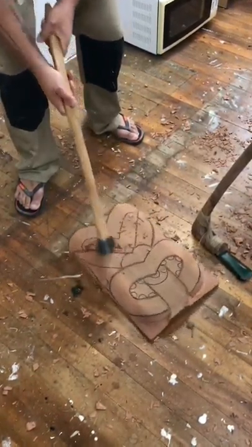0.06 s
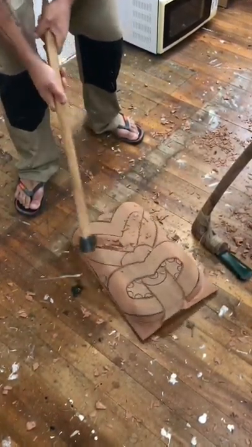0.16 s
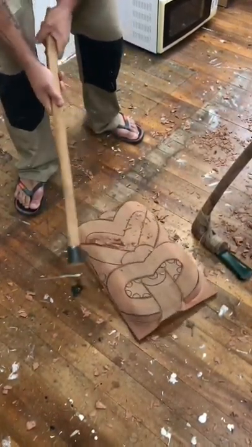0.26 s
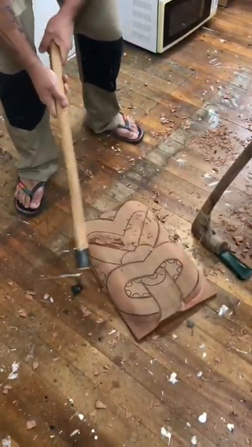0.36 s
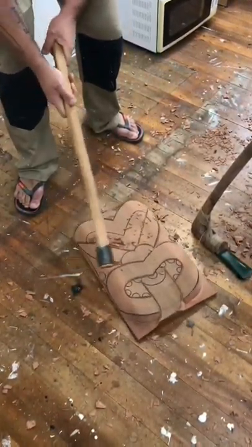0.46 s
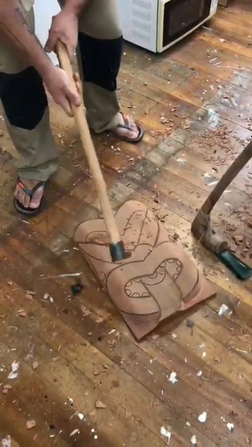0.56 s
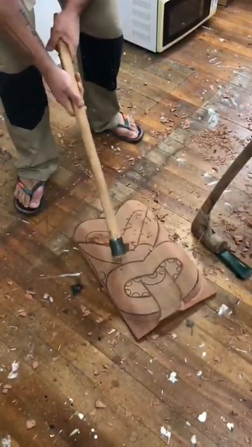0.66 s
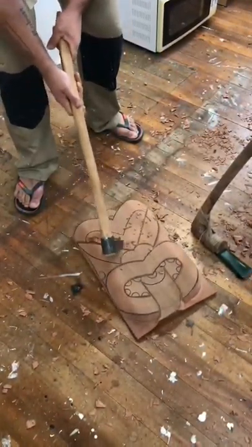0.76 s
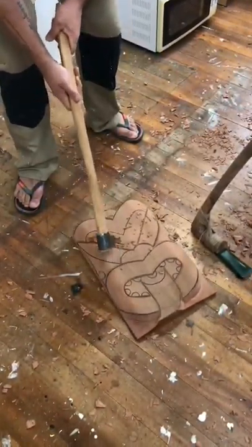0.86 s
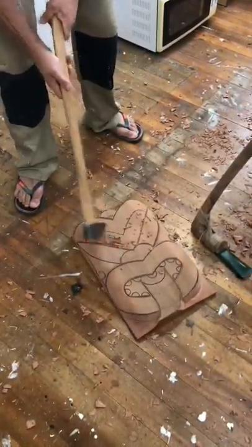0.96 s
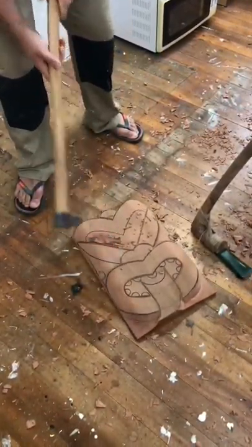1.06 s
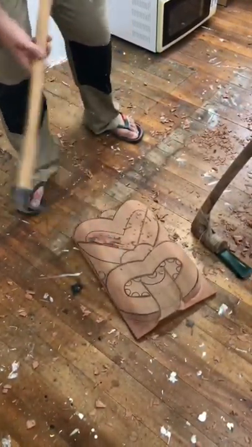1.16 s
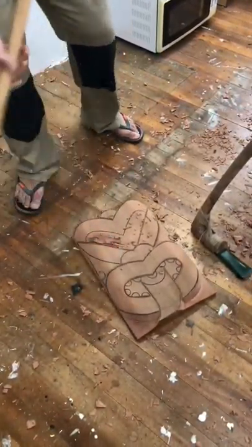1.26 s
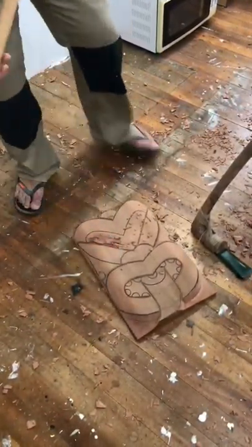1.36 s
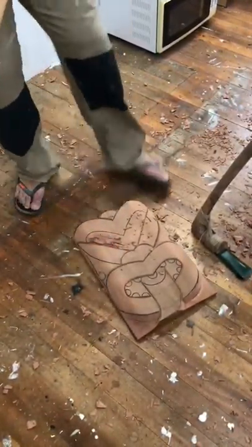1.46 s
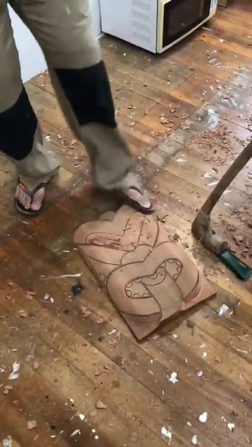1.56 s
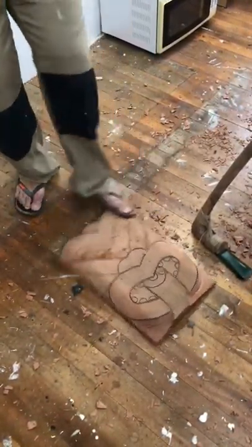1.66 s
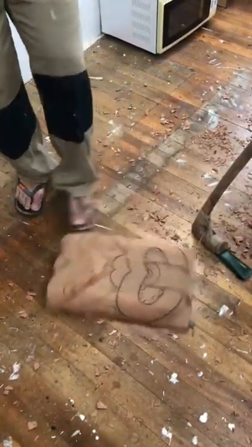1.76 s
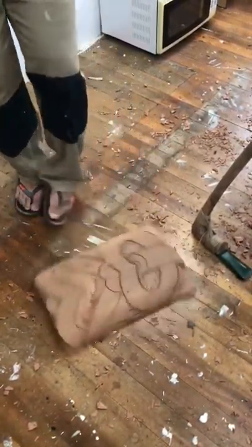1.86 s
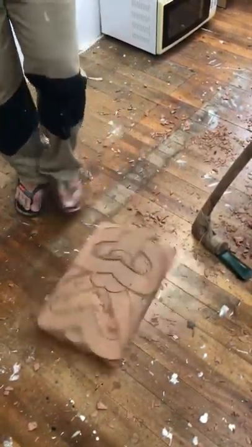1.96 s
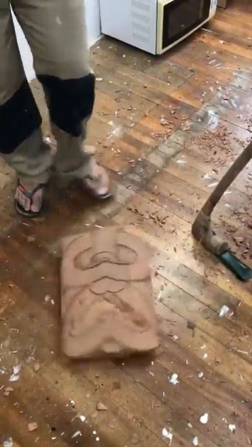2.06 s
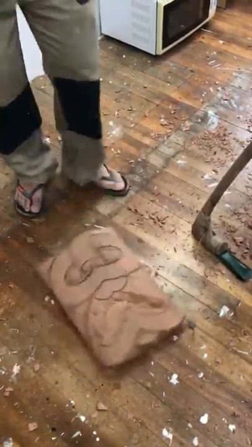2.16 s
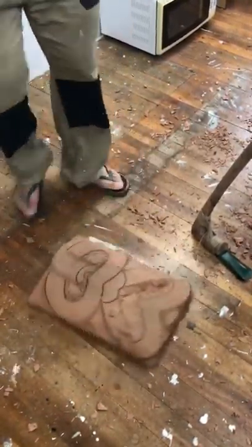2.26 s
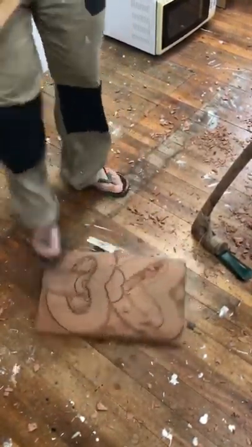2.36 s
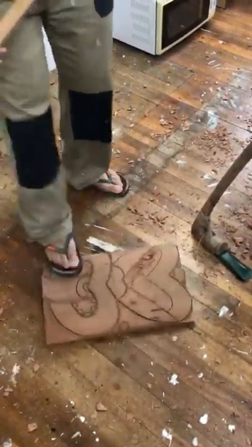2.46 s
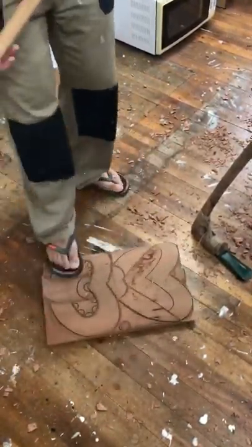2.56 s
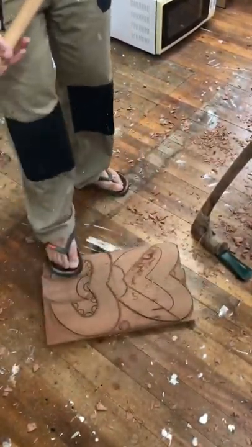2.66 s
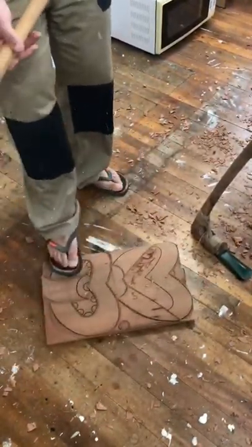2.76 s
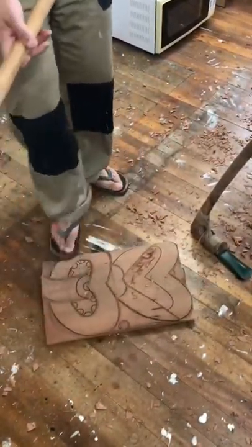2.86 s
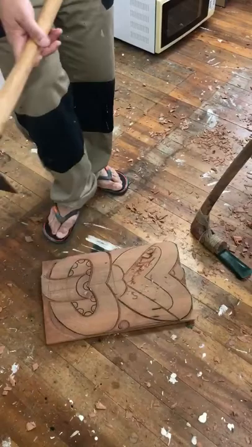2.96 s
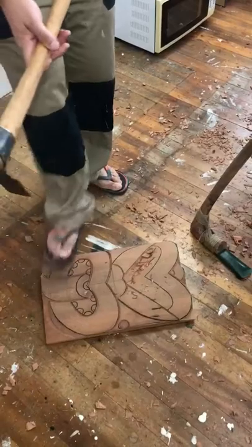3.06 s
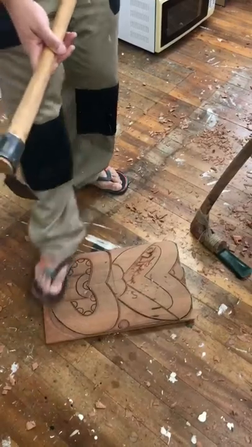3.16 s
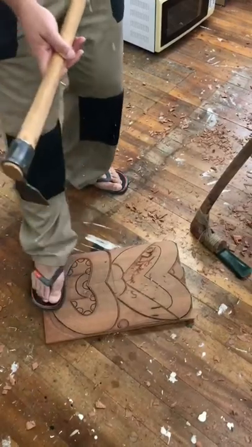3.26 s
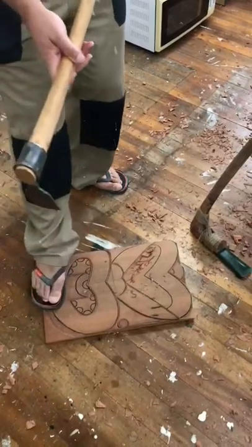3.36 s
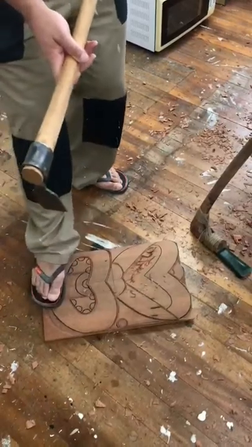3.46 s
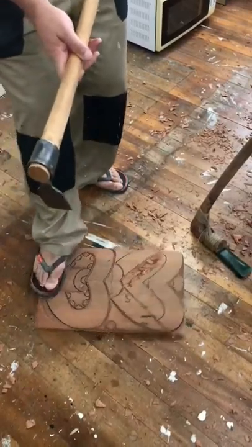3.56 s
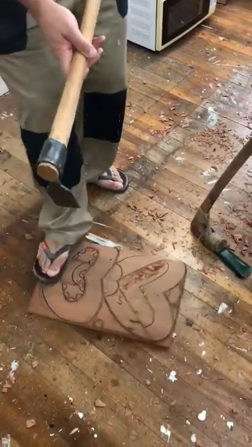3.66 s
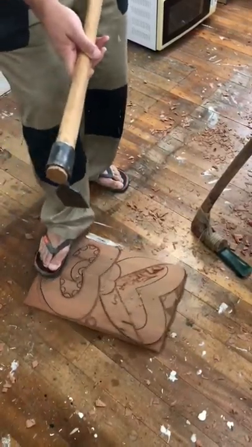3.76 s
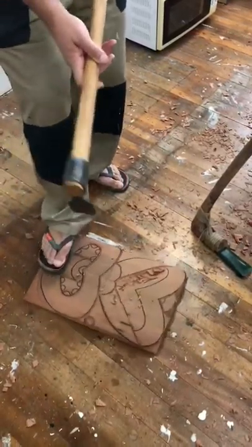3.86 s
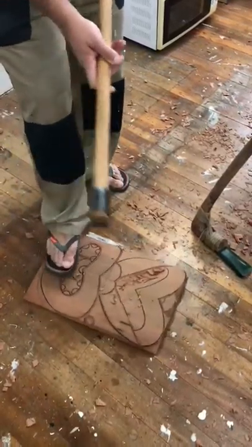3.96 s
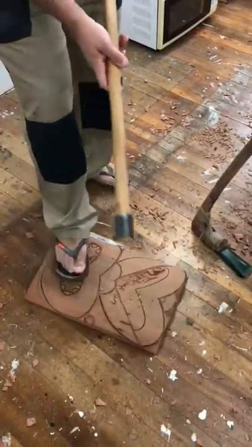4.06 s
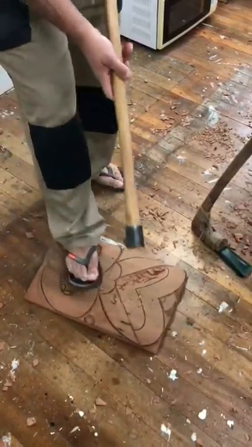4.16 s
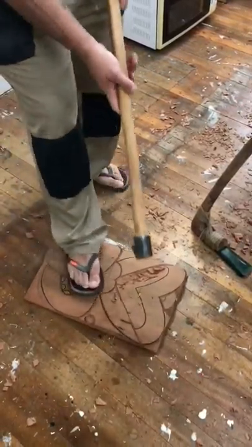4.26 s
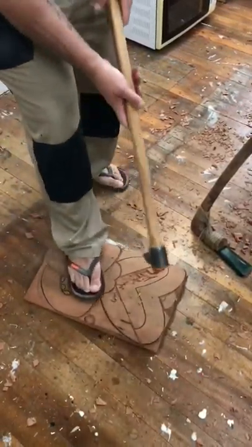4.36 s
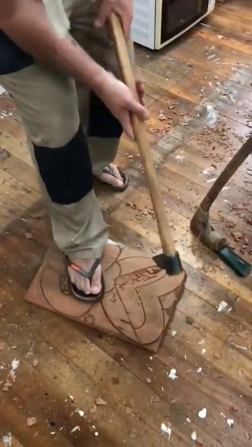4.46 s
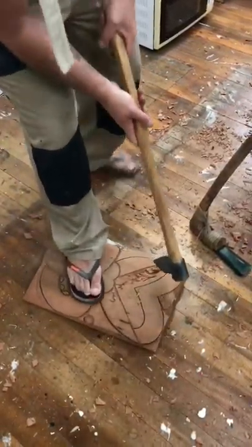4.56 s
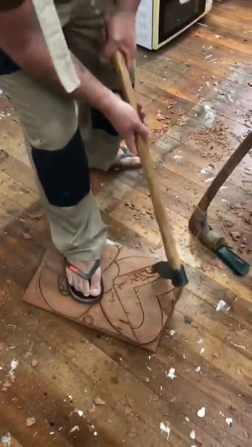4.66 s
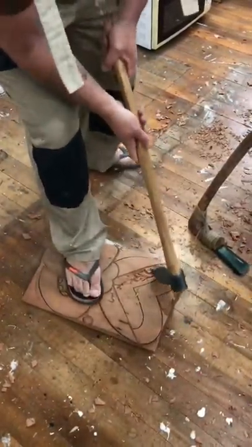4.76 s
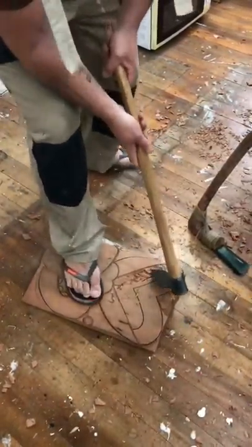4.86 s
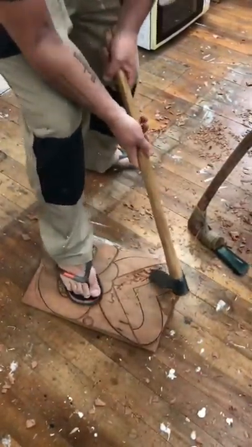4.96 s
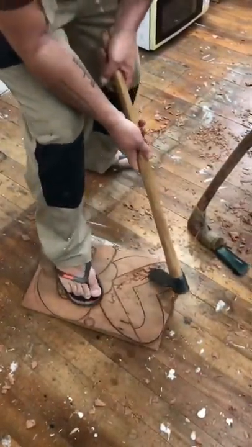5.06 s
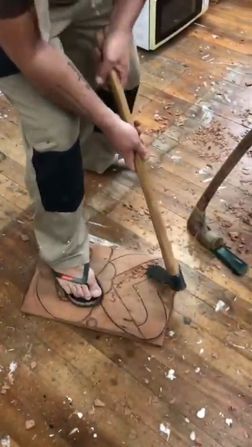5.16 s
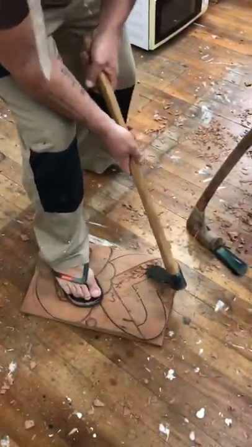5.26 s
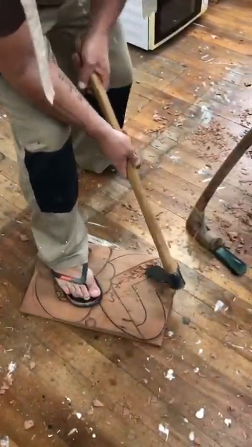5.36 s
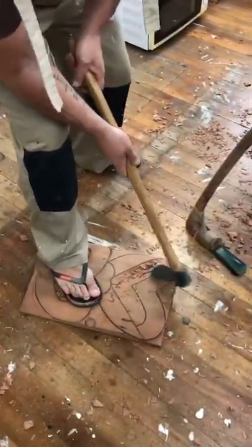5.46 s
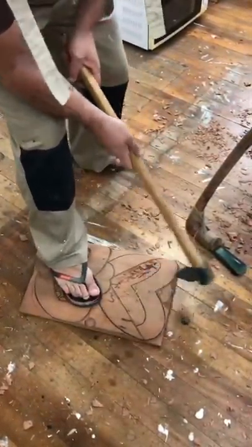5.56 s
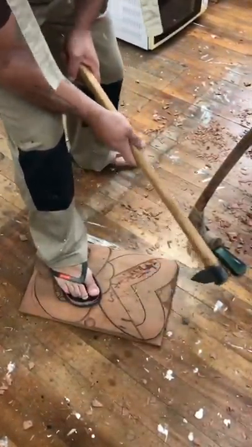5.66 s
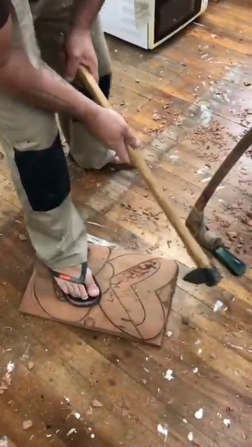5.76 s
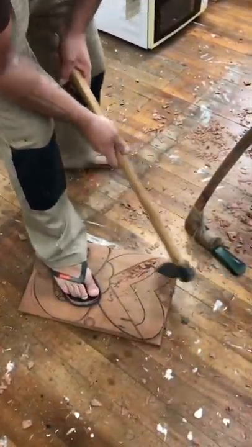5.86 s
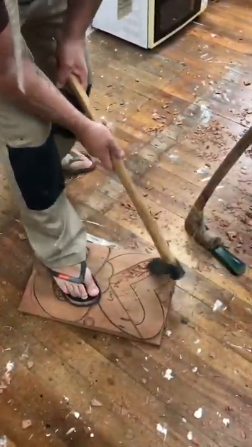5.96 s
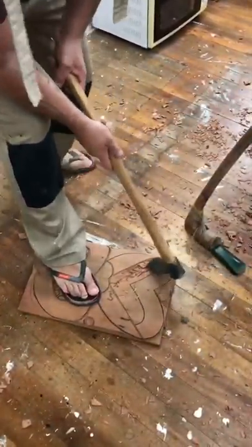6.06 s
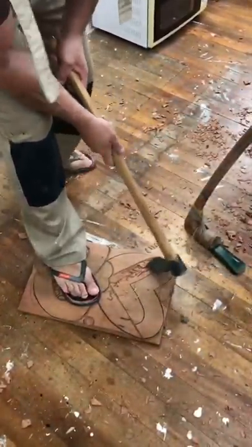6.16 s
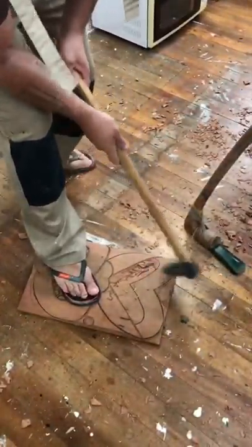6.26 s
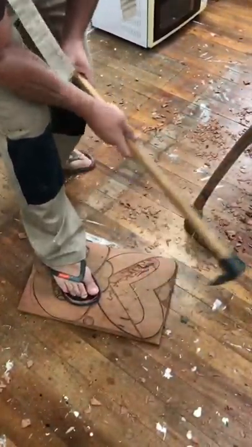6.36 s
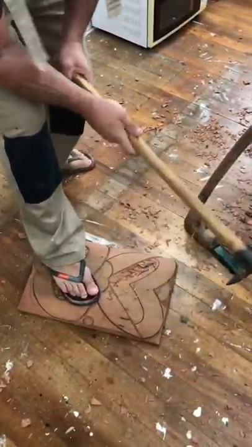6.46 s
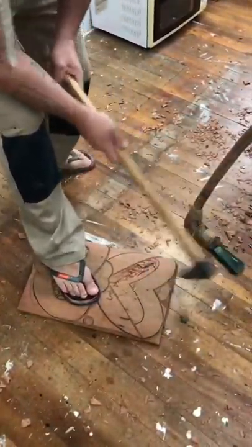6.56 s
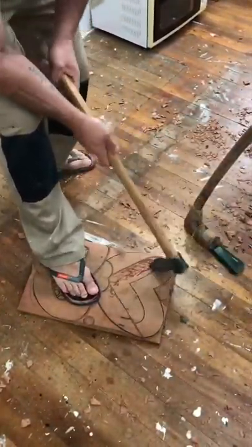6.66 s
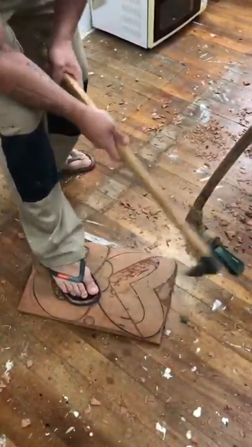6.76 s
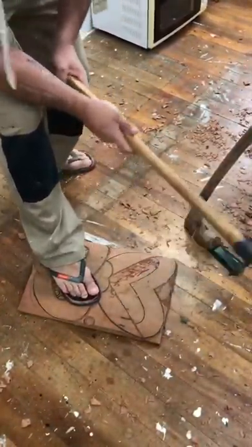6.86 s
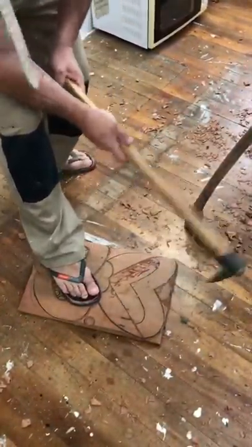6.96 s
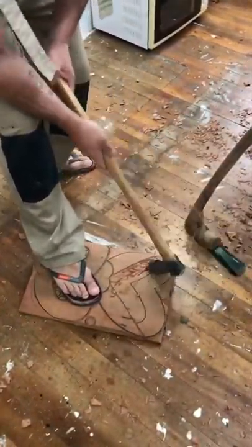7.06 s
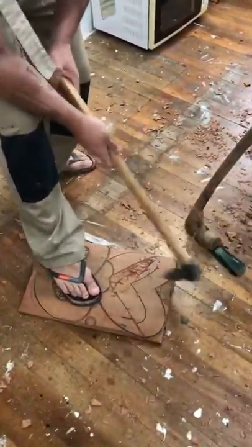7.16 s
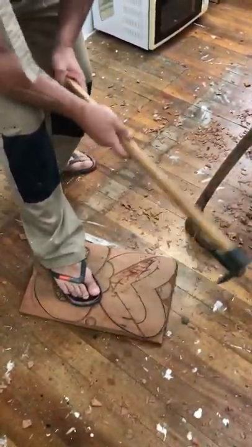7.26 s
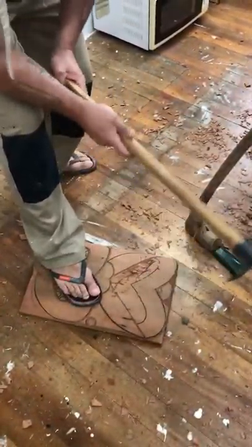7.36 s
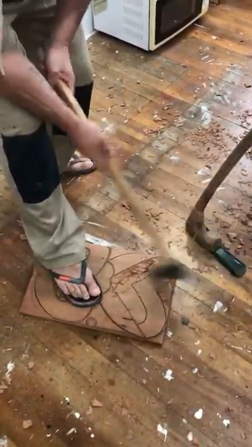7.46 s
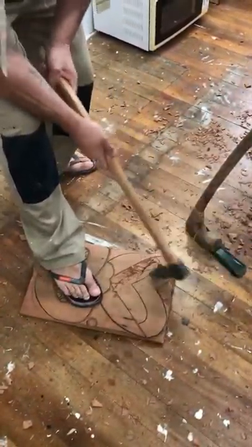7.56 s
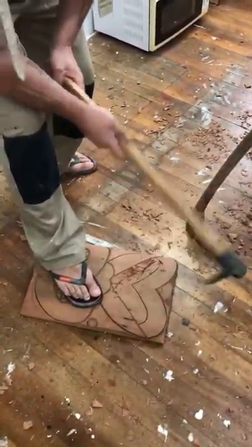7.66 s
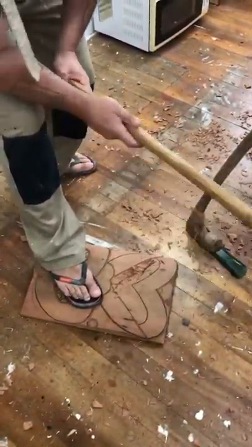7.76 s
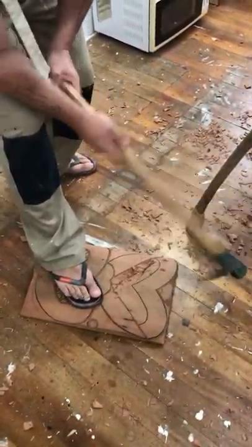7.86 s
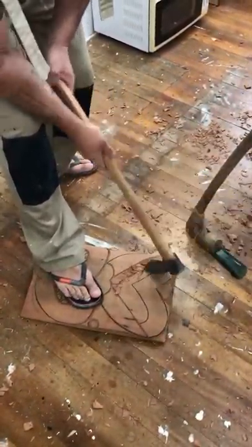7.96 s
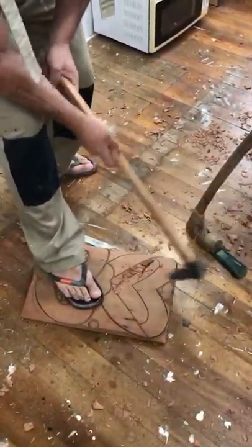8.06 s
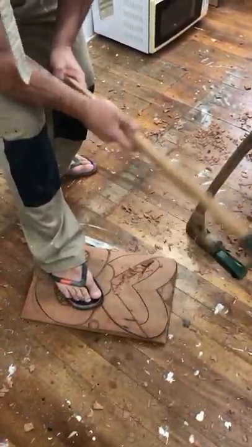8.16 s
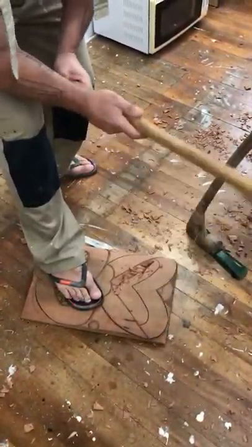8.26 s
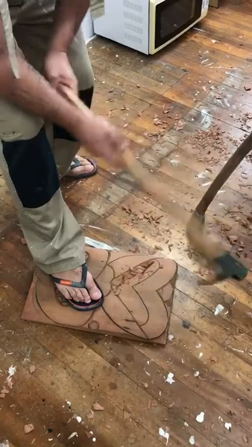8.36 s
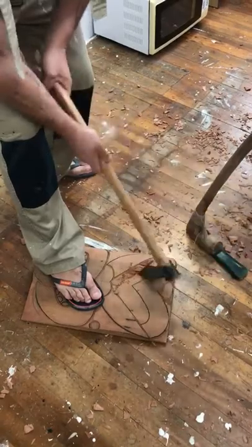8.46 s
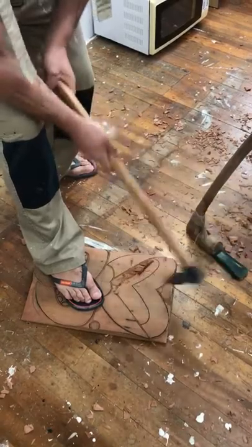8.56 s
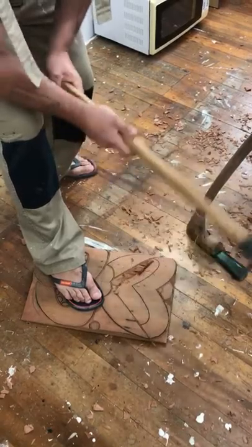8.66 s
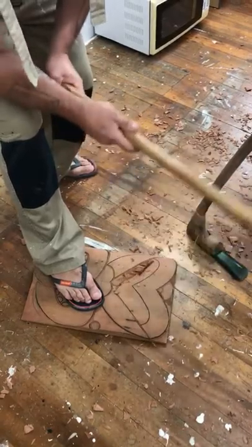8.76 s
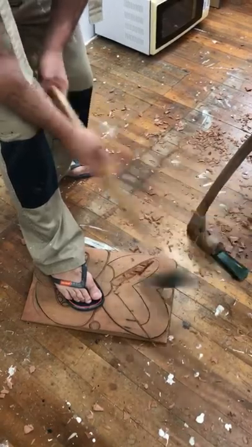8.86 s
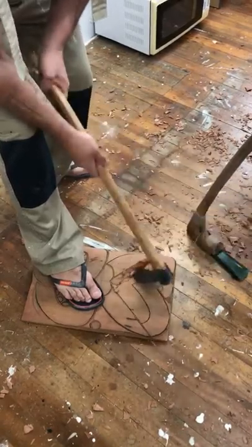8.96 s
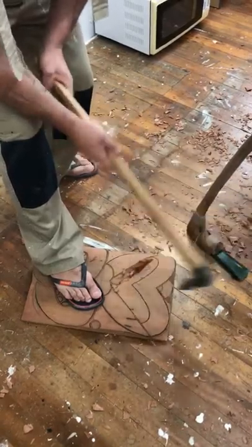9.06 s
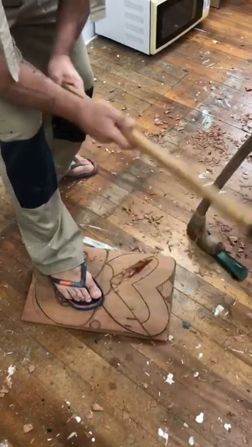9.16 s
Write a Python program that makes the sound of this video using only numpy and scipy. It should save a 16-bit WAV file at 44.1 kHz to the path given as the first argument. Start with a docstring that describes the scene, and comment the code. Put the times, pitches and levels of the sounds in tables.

```python
"""A faint noise dies away into quiet room tone as two light adze cuts bite a carved panel on workshop floorboards.
A foot shoves the panel round with grinding and swish; it rocks and knocks; a trial stroke, then six hard chops.
Each chop is a crunch of noise grains for parting fibres, then a thump of decaying panel and floor modes.
Chatter, dry chip ticks and light taps add detail; decaying noise makes the room's echoes."""
import sys
import numpy as np
from scipy import signal
from scipy.fft import rfft, irfft
from scipy.io import wavfile
from scipy.ndimage import uniform_filter1d, minimum_filter1d

SR = 44100
rng = np.random.default_rng(int(sys.argv[2]) if len(sys.argv) > 2 else 0)


def wav_out(sig):
    """Save sig, one row per channel (or a flat mono array), as 16-bit PCM at SR to the path in sys.argv[1]."""
    wavfile.write(sys.argv[1], SR, np.round(np.clip(np.atleast_2d(sig).T, -1, 1) * 32767).astype(np.int16))


N = 406585
CUTOFF_HZ = 16000
TIME = np.arange(N) / SR
RING = TIME[:SR * 5 // 4]  # time axis of every ring and echo, 1.25 s


def from_db(db):
    """Decibels to gain."""
    return 10 ** (np.asarray(db) / 20)


def rms_one(x):
    """Scale to unit rms."""
    return x / np.sqrt(np.mean(x ** 2) + 1e-20)


def at_hz(points, hz):
    """Read a table on a log-frequency axis."""
    f, value = np.transpose(points)
    return np.interp(np.log(np.maximum(hz, 1)), np.log(f), value)


def add(out, s, sound):
    """Mix a sound in at a time in seconds."""
    start = max(int(s * SR), 0)
    out[start:start + len(sound)] += sound[:max(N - start, 0)]


def lowpass(x, hz, order=2):
    """Butterworth low-pass."""
    return signal.sosfilt(signal.butter(order, min(hz, CUTOFF_HZ), fs=SR, output="sos"), x)


def colour(x, spectrum, size=8192):
    """Causal (minimum-phase) filter of unit power with the given spectrum."""
    gain = rms_one(from_db(at_hz(spectrum, np.fft.rfftfreq(size, 1 / SR))))
    cepstrum = irfft(np.log(gain))[:size // 2]
    cepstrum[0] /= 2
    response = irfft(np.exp(rfft(2 * cepstrum, size)))
    return signal.oaconvolve(x, response)[:len(x)]


def resonate(x, hz, width_hz):
    """Two-pole resonance with gain 1 on top."""
    r = np.exp(-np.pi * width_hz / SR)
    numerator = (1 - r * r) / 2 * np.array([1, 0, -1])
    return signal.lfilter(numerator, [1, -2 * r * np.cos(2 * np.pi * hz / SR), r * r], x)


def grains(count, per_s, spread_db):
    """Random tiny fractures of uneven size; rms 1."""
    sizes = from_db(spread_db * np.minimum(rng.exponential(1, count), 4))
    signs = rng.choice([-1, 1], count)
    happens = rng.random(count) < per_s / SR
    return rms_one(sizes * signs * happens)


def ringing(modes):
    """One decaying sine for each mode."""
    hz, db, t60 = np.transpose(modes)[:, :, None]
    return from_db(db - 60 * RING / t60) * np.sin(2 * np.pi * hz * RING)


# modes of the floorboards and of the air above them: f/Hz, relative level/dB, t60/s
FLOOR_MODES = [(48, -21, 0.6), (71, -7, 0.23), (79, -19, 0.28), (91, -18, 0.29), (115, -13, 0.31),
               (136, -10, 0.26), (154, -13, 0.46), (213, -15, 0.47), (237, -18, 0.59), (260, -14, 0.39),
               (278, -12, 0.37), (313, -20, 0.36)]
# modes of the panel before foot and blade damp it: f/Hz, relative level/dB, t60/s
PANEL_MODES = [(178, -11, 0.47), (351, -8, 0.26), (373, -16, 0.28), (405, -19, 0.3), (433, -15, 0.28),
               (531, -19, 0.27), (604, -16, 0.21), (644, -16, 0.27), (709, -16, 0.26), (752, -21, 0.28),
               (914, -19, 0.24), (1126, -16, 0.19), (1285, -18, 0.2), (1700, -23, 0.07), (2190, -24, 0.08)]
# colour of the chatter on the boards: f/Hz, relative level/dB per Hz
CHATTER_COLOUR = [(100, 3), (250, 3), (450, 0), (700, -0.5), (1300, -4.5), (2000, -9), (3500, -16.5),
                  (6000, -21), (16000, -28)]


def blows(clack_t60=0.11, slap_db=7.0, slap_t60=0.013, vary_db=1.0, detune=0.013, foot_per_s=6.9,
          low_db=3.0, low_hz=90):
    """Each blow rings the panel and the floor beneath; a soft contact reaches only the low modes."""
    # the foot and the resting blade damp the panel
    panel = ringing(PANEL_MODES) * np.exp(-foot_per_s * RING)
    out = np.zeros(N)
    # neighbouring floor modes move in opposite senses, so the boom swells after the knock
    boom = (-1) ** np.arange(len(FLOOR_MODES)) @ ringing(FLOOR_MODES)
    # the joists add weight at the bottom
    boom = boom + (from_db(low_db) - 1) * lowpass(boom, low_hz, order=1)
    # the panel slaps down, then chatters briefly against the boards
    slap = from_db(slap_db) * np.exp(-np.log(1000) * RING / slap_t60)
    settling = slap + np.exp(-np.log(1000) * RING / clack_t60)
    settling /= settling[0]
    for s, floor_db, panel_db, chatter_db, hard_hz in impacts():
        knock = from_db(panel_db + rng.normal(0, vary_db, len(PANEL_MODES))) @ panel
        # its pitch shifts a little as it seats differently on the boards
        knock = np.interp(RING * (1 + detune * rng.standard_normal()), RING, knock)
        chatter = colour(rng.standard_normal(len(RING)) * settling, CHATTER_COLOUR)
        hit = from_db(floor_db) * boom + knock + from_db(chatter_db) * chatter
        add(out, s, lowpass(hit, hard_hz))
    return out


# adze strokes; the blow lands as the cut ends: cut start t/s, cut level/dB before scaling by its swell,
# cut length/s, chip ring f/Hz, ring level against the crunch/dB, blow level/dB, hardness (low-pass) f/Hz
STROKES = [(0.173, -42.5, 0.0049, 12600, 14, -38, 70), (0.936, -27.5, 0.00806, 3830, -9, -4.5, 58),
           (6.134, -25.5, 0.014, 2590, -21, -3, 80), (6.832, -14.5, 0.0075, 1400, -2.5, -2.5, 1500),
           (7.2669, -20.5, 0.0094, 3300, 0.5, -1.5, 1390), (7.6944, -11.5, 0.006, 2860, -15, 1, 1400),
           (8.1365, -15, 0.0056, 1460, -5, 1.5, 1650), (8.636, -11.5, 0.006, 4800, -23, 0.5, 1600),
           (9.1008, -13.5, 0.0051, 2500, -1, 0.5, 1400)]
# the panel rocks and knocks on the boards: t/s, level/dB, hardness (low-pass) f/Hz
KNOCKS = [(2.663, 0.5, 1140), (3.445, -1, 1060), (4.435, -0.9, 1620), (5.355, -12, 616)]
# the feet come down or shift their weight: t/s, level/dB, hardness (low-pass) f/Hz
STEPS = [(1.773, 2, 150), (3.138, 0, 80), (4.088, -1, 62), (4.89, -10.5, 90), (4.945, -13, 80),
         (5.15, 0, 101)]
# mix of each kind of impact, added to its level: floor/dB, panel/dB, chatter/dB
STROKE_SHARE, KNOCK_SHARE, STEP_SHARE = (-2, -1.2, 3.2), (-10, -4.5, -0.3), (-16.5, -24.5, -28)


def impacts():
    """Strokes, knocks and steps share one contact model: t/s, floor/dB, panel/dB, chatter/dB, hardness f/Hz."""
    strokes = [(s + length, *np.add(STROKE_SHARE, db), hz) for s, _, length, _, _, db, hz in STROKES]
    knocks = [(s, *np.add(KNOCK_SHARE, db), hz) for s, db, hz in KNOCKS]
    steps = [(s, *np.add(STEP_SHARE, db), hz) for s, db, hz in STEPS]
    return strokes + knocks + steps


# colour of the parting fibres: f/Hz, relative level/dB per Hz
CRUNCH_COLOUR = [(200, -13), (450, -3), (800, 1.5), (1500, 2), (1900, -1), (3000, 1.5), (4500, -9.5),
                 (5400, -3), (8000, -12), (12000, -10), (15000, -9)]


def cuts(fibres_per_s=14000, spread_db=2.7, release_s=0.0011, ring_width=0.26, count=4096):
    """Fibres part in a dense crunch until the wood stops the edge; each chip rings at a pitch of its own."""
    out, t = np.zeros(N), TIME[:count]
    for s, db, length, ring_hz, ring_db, _, _ in STROKES:
        # full bite halfway through the cut, quick release at its end
        depth = np.minimum(2 * t / length, 1) * np.exp(-np.maximum(t - length, 0) / release_s)
        fibres = depth * grains(count, fibres_per_s, spread_db)
        crunch = rms_one(colour(fibres, CRUNCH_COLOUR))
        chip = rms_one(resonate(fibres, ring_hz, ring_width * ring_hz))
        add(out, s, from_db(db) * np.std(depth) * (crunch + from_db(ring_db) * chip))
    return out


# chips snap and tick: t/s, level/dB before the common trim, treble against the middle/dB
CHIP_TICKS = [(0.172, -29, 14), (1.405, -25, -22), (1.768, -15.5, -5), (2.4956, -19.5, -12.5),
              (2.661, -17, -1), (3.433, -14.5, -22), (3.666, -19.5, -28), (4.593, -27, -16),
              (4.712, -29, -6), (4.812, -23.5, -3.5), (4.974, -36.5, 3), (5.032, -22, -9),
              (5.144, -22.5, 6), (5.75, -26.5, -28), (6.442, -34, 3), (6.513, -21, -20), (6.553, -25, 8),
              (6.65, -19.5, -3.5)]
# colour of a splinter before its treble is set: f/Hz, relative level/dB per Hz
CHIP_COLOUR = [(300, 0), (800, 3), (1400, 6), (3000, 6), (5000, -2.5), (9000, -2.5), (16000, -9)]


def chips(snap_s=0.0043, snap_db=-13.5, split_hz=3000, count=4096):
    """Small splinters break with a quick, dry tick of decaying fracture grains."""
    out = np.zeros(N)
    for s, db, treble_db in CHIP_TICKS:
        burst = grains(count, 10000, 0.9) * np.exp(-TIME[:count] / snap_s)
        snap = colour(burst, CHIP_COLOUR)
        middle = lowpass(snap, split_hz, order=1)
        treble = snap - middle
        add(out, s, from_db(db + snap_db) * (middle + from_db(treble_db) * treble))
    return out


# resonances of the dragged panel: f/Hz, width/Hz, relative level/dB
GRIND_RESONANCES = [(352, 190, 2), (713, 54, 7.5), (1046, 350, -0.5), (1426, 21, 3), (1630, 260, -14.5),
                    (2580, 980, -8.5)]
# colour of the fine swish: f/Hz, relative level/dB per Hz
SWISH_COLOUR = [(880, -16), (1500, -4.5), (3290, -2), (4830, -7.5), (6360, -4), (7740, -10.5), (12000, -11),
                (15700, -10.5)]


def slides(grind_db=-3.0, swish_db=1.5, rumble_db=-3.0):
    """Wood, sole and blade rub over grit: coarse grinding, a fine swish, and rumble in the boards."""
    # the contact catches and slips unevenly
    wander = rms_one(uniform_filter1d(rng.standard_normal(N), size=500))
    slips = rms_one(from_db(3.0 * wander))
    grit = grains(N, 2200, 3.0) * slips
    grind = np.zeros(N)
    for k, (hz, width, db) in enumerate(GRIND_RESONANCES):
        grind += (-1) ** k * from_db(db) * resonate(grit, hz, width)
    grind = rms_one(grind)
    swish = rms_one(colour(grains(N, 9000, 0.99) * np.sqrt(slips), SWISH_COLOUR))
    # f/Hz, relative level/dB per Hz
    rumble_colour = [(25, -28), (60, 9), (120, 1.0), (280, -10), (500, -22.5), (2000, -50)]
    rumble = colour(grains(N, 400, 3.6), rumble_colour)
    grinding, swishing, rumbling = rubbing()
    return (from_db(grind_db) * grind * grinding
            + from_db(swish_db) * swish * swishing
            + from_db(rumble_db) * rumble * rumbling)


def rubbing():
    """Smoothed gains of grinding, swish and rumble: rubbing is heard only while the contact moves."""
    gains = np.zeros((3, N))
    shove(*gains)
    scuffs(gains)
    skim(*gains[:2])
    return uniform_filter1d(gains, size=200)


# a foot shoves the panel round, before trims: t/s, grinding level/dB, rumble level of the boards/dB
SHOVE = [(1.805, -50.5, -26), (1.845, -49, -39), (1.913, -35.5, -31.5), (2.043, -43, -32.5),
         (2.079, -45.5, -43), (2.159, -41.5, -48), (2.253, -42, -38), (2.323, -49.5, -37),
         (2.503, -45.5, -41.5), (2.561, -52.5, -50), (2.647, -47, -33), (2.655, -40.5, -25)]
# swish at the mean grinding level, before the swish trim, and the share of the grinding's swing it follows
SHOVE_SWISH_DB, SHOVE_SWISH_FOLLOWS = -48.3, 0.63


def shove(grind, swish, rumble, grind_db=3.0, rumble_db=2.0, slowing_db_per_s=4.0):
    """The dragged panel grinds and rumbles in surges; the swish thins out as it slows."""
    s, *columns = np.transpose(SHOVE)
    grinding, rumbling = (np.interp(np.arange(s[0], s[-1], 1 / SR), s, c) for c in columns)
    add(grind, s[0], from_db(grinding + grind_db))
    swishing = SHOVE_SWISH_FOLLOWS * grinding - slowing_db_per_s * TIME[:len(grinding)]
    add(swish, s[0], from_db(SHOVE_SWISH_DB + swishing - swishing.mean()))
    add(rumble, s[0], from_db(rumbling + rumble_db))


# short scuffs of sole and panel, before trims: start t/s, length/s, grinding, swish and rumble level/dB
SCUFFS = [(1.288, 0.17, -52, -58.5, -49.5), (1.429, 0.14, -50, -54, -50), (2.968, 0.155, -58, -44, -50),
          (3.62, 0.42, -43.5, -59, -38), (4.12, 0.2, -74, -66, -50), (4.687, 0.13, -55, -49, -48),
          (4.79, 0.13, -49.5, -55.5, -45), (5.03, 0.1, -54, -60, -60), (5.118, 0.09, -41.5, -48, -52),
          (6.389, 0.087, -57, -59, -65)]
SCUFF_ROUNDNESS = 1.23  # low: flat-topped, high: pointed


def scuffs(gains):
    """Each scuff is one swell of rubbing as the contact speeds up and stops."""
    for start, length, *levels in SCUFFS:
        swell = np.sin(np.pi * TIME[TIME < length] / length) ** SCUFF_ROUNDNESS
        for gain, db in zip(gains, levels):
            add(gain, start, from_db(db) * swell)


# levels before the grinding and swish trims
SKIM_START_S, SKIM_LENGTH_S = 6.012, 0.126
SKIM_GRIND_DB, SKIM_SWISH_DB, SKIM_RISE_DB_PER_S = -47, -50, 100


def skim(grind, swish):
    """The edge skims along the grain, biting ever deeper, into the trial stroke: its swish rises."""
    t = TIME[TIME < SKIM_LENGTH_S]
    add(grind, SKIM_START_S, from_db(SKIM_GRIND_DB) * np.ones(len(t)))
    add(swish, SKIM_START_S, from_db(SKIM_SWISH_DB + SKIM_RISE_DB_PER_S * t))


# light taps of the blade on the panel: t/s, level/dB
BLADE_TAPS = [(6.514, -40), (6.556, -41), (6.652, -39.5)]
# modes of the panel under the blade's taps: f/Hz, relative level/dB, t60/s
BLADE_TAP_MODES = [(1070, -7, 0.093), (1282, -2.5, 0.11), (1400, -4, 0.052), (2900, -16, 0.06)]
# taps on the panel with no foot on it, so it rings on: t/s, level/dB
LOOSE_TAPS = [(.939, -34.5), (1.769, -52), (2.496, -49)]
# modes of the loose panel: f/Hz, relative level/dB, t60/s
LOOSE_MODES = [(762, 7.5, 0.12), (834, 4.5, 0.096), (1054, 1.5, 0.076), (2630, -27, 0.11), (4420, -12, .07),
               (5330, -7, .06), (5900, 2, 0.0544)]


def taps(rows, modes):
    """Light touches set a few modes ringing."""
    out, ring = np.zeros(N), ringing(modes).sum(axis=0)
    for s, db in rows:
        add(out, s, from_db(db) * ring)
    return out


# decay of the room's echoes: f/Hz, t60/s
ROOM_T60 = [(60, 0.94), (170, 0.39), (240, 1.33), (300, 0.58), (420, 0.78), (1200, 0.85), (3000, 0.58),
            (7000, 0.31), (15000, 0.37)]
# level of the echoes against the direct sound: f/Hz, level/dB
ROOM_LEVEL = [(50, -10.5), (170, -2.5), (250, -4), (340, -4), (550, -12.5), (1200, -10.5), (3000, -9),
              (7000, -7.5), (15000, -14.5)]


def echoes(x, build_s=0.00096):
    """Diffuse echoes build up quickly and die at their own pace in each third of an octave."""
    white = rfft(rng.standard_normal(len(RING)))
    hz = np.fft.rfftfreq(len(RING), 1 / SR)
    answer, onset = np.zeros(len(RING)), (1 - np.exp(-RING / build_s)) ** 2
    for centre in 40 * 2 ** (np.arange(27) / 3):
        # triangular bands that overlap into an even whole
        share = np.maximum(1 - 3 * abs(np.log2((hz + 1) / centre)), 0)
        band = irfft(white * share, len(RING))
        fade = onset * np.exp(-np.log(1000) * RING / at_hz(ROOM_T60, centre))
        answer += from_db(at_hz(ROOM_LEVEL, centre)) * band * fade / np.linalg.norm(fade)
    return signal.oaconvolve(x, answer)[:N]


# colour of the quiet room: f/Hz, relative level/dB per Hz
AIR_COLOUR = [(15, -53.5), (25, -8), (53, 7), (76, -9), (217, -9), (263, -24.5), (293, -4.5), (326, -22.5),
              (887, -27.5), (1610, -25), (1790, -27.5), (3250, -32), (3820, -34), (4140, -33.5),
              (16000, -47.5)]
# steady background, and a faint noise that dies away at the start
AIR_DB, FADING_NOISE_DB, FADING_NOISE_DB_PER_S = -48.5, -43, 30


def room_air():
    """Coloured noise: a steady bed with a fading layer on top."""
    fading = from_db(FADING_NOISE_DB - FADING_NOISE_DB_PER_S * TIME)
    return (from_db(AIR_DB) + fading) * rms_one(colour(rng.standard_normal(N), AIR_COLOUR))


def scene(count=3):
    """All the work sounds in the room, over its quiet background."""
    # a blow radiates differently towards each wall; the first of these directions also reaches the microphone
    strikes = [blows() + cuts() + chips() for _ in range(count)]
    handling = slides() + taps(BLADE_TAPS, BLADE_TAP_MODES) + taps(LOOSE_TAPS, LOOSE_MODES)
    room = sum(echoes(x) for x in strikes) / np.sqrt(count) + echoes(handling)
    return (strikes[0] + handling + room + room_air())[None]


def record(dry, bass_hz=38, ceiling=1.0, release_db_per_s=800):
    """The microphone drops the deepest bass; a fast limiter turns down peaks over the ceiling; the top is cut."""
    sound = signal.sosfilt(signal.butter(2, bass_hz, "high", fs=SR, output="sos"), dry)
    over = 20 * np.log10(np.maximum(abs(sound[0]) / ceiling, 1))
    # instant attack, steady release in dB
    held = np.maximum.accumulate(over + release_db_per_s * TIME) - release_db_per_s * TIME
    gain = uniform_filter1d(minimum_filter1d(from_db(-held), size=31), size=31)
    top_cut = signal.ellip(10, .1, 70, CUTOFF_HZ, fs=SR, output="sos")
    return signal.sosfilt(top_cut, sound * gain)


dry = scene()
out = record(dry)
wav_out(out)
```